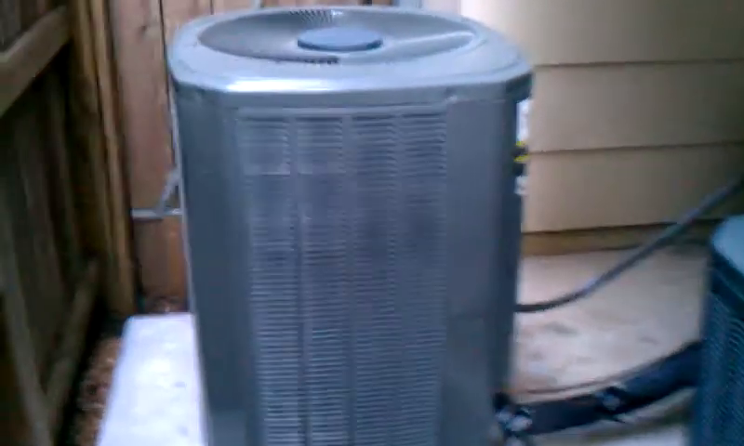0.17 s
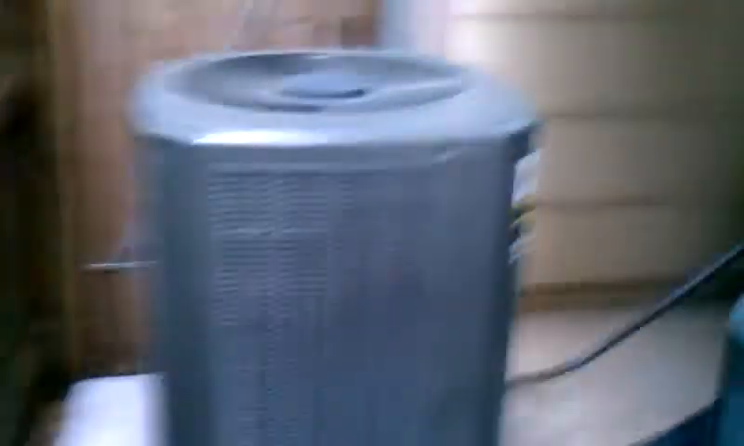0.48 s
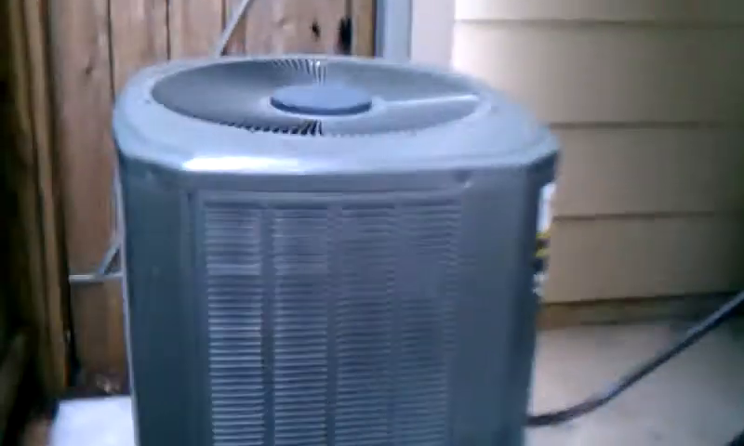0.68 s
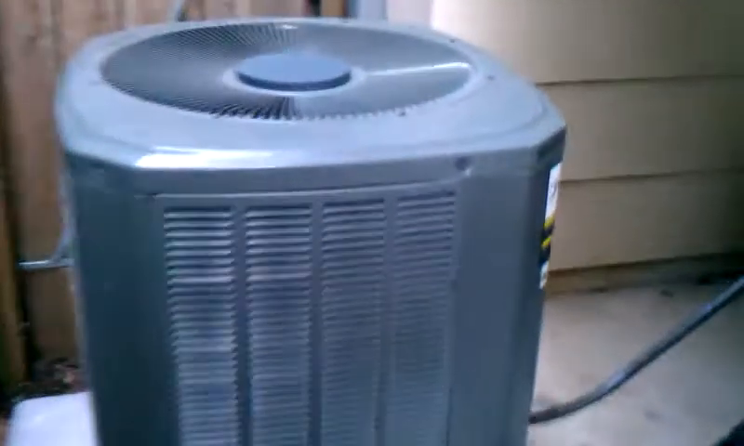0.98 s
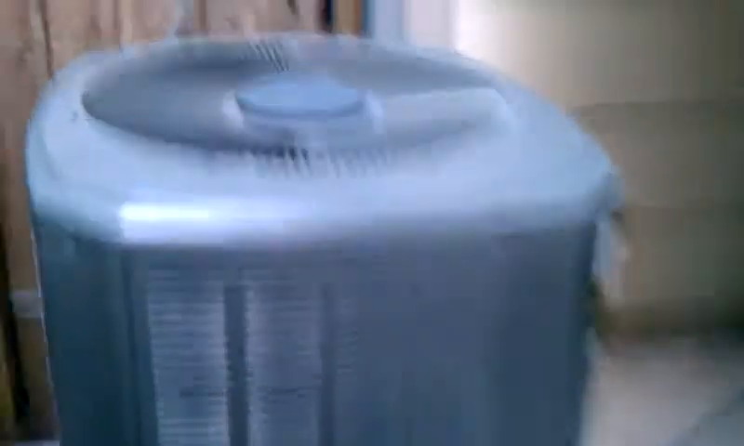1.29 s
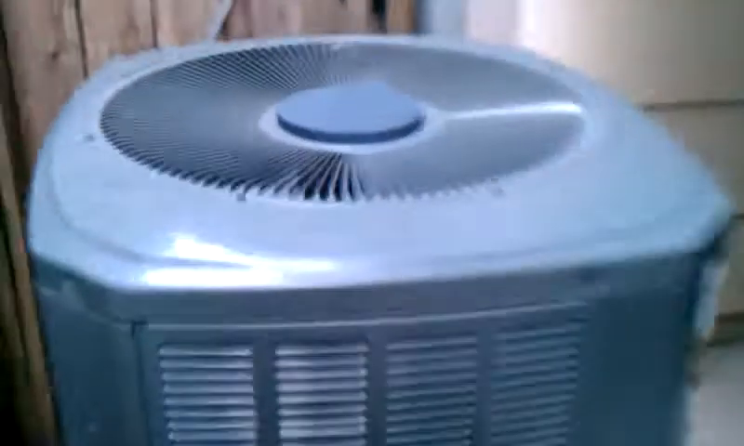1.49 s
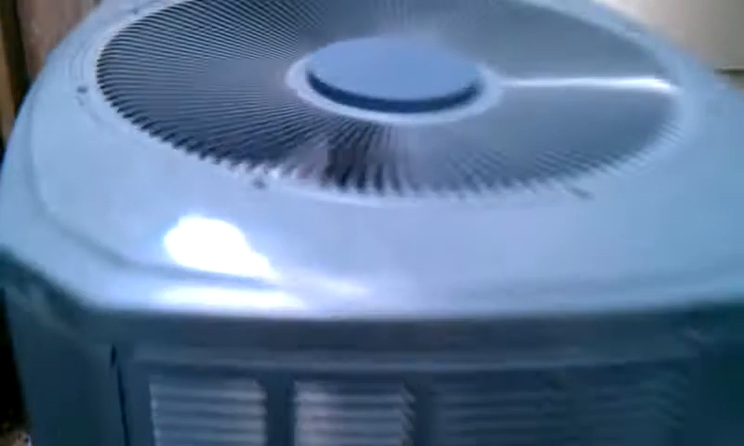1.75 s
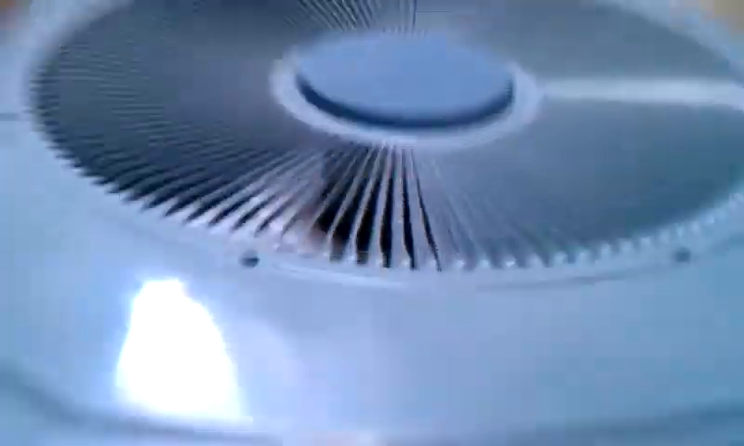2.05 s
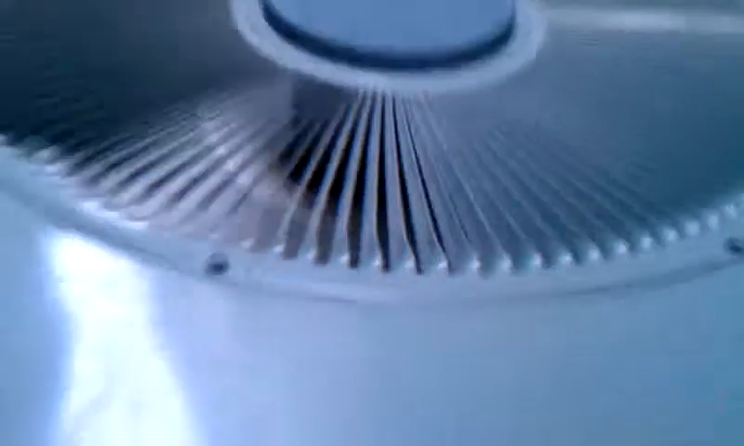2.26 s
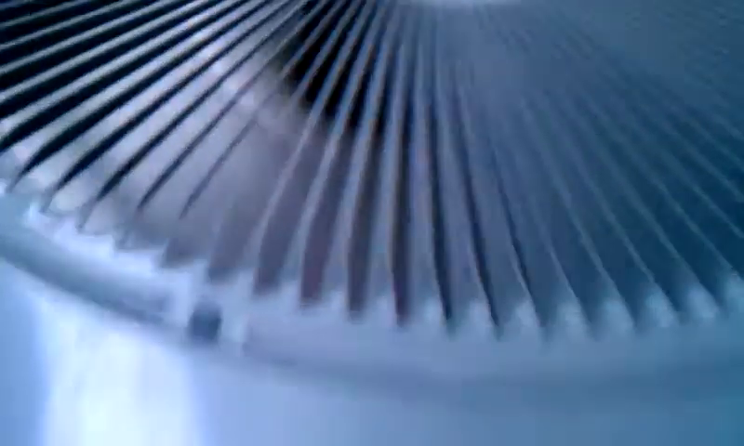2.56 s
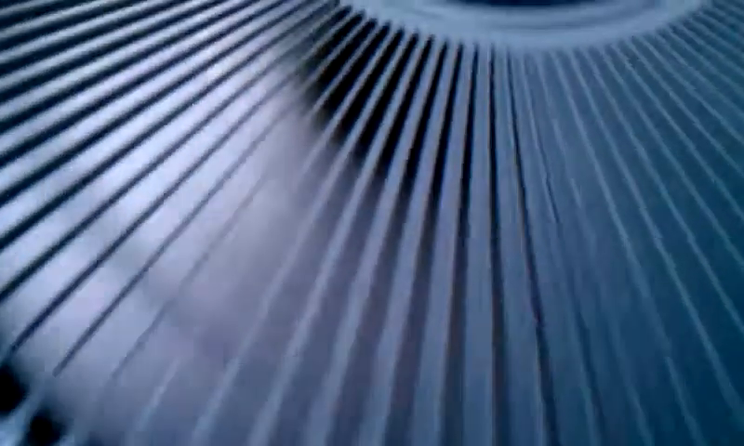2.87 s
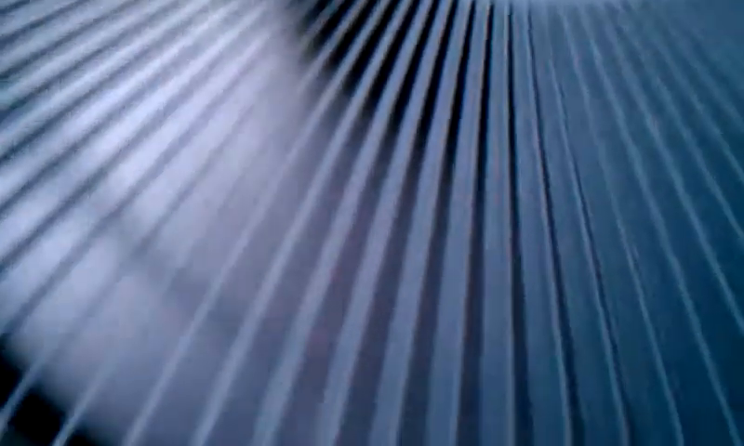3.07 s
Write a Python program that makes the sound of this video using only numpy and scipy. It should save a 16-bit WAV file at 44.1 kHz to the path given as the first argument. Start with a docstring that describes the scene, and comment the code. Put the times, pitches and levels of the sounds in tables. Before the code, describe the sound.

Air conditioner's airy fan roar with low motor hum swells closer, ending in rumbling draught puffs

```python
"""Outdoors, close beside an air conditioner; a phone walks up from its side to the grille on top.
Air rushes through the slats as flickering noise bands, with a faint narrow band of noise that slides
down and, before it, three fainter ones that may pass for chance ripples of the rush.
Blade tones, summed cosines, beat against the motor's mains hum; at last the draught buffets the microphone
with a gusty rumble and puffs. The level drops twice; one lost block makes the tones skip, with a faint tick."""
import sys
import numpy as np
from scipy import signal
from scipy.fft import rfft, irfft, next_fast_len
from scipy.io import wavfile
from scipy.ndimage import uniform_filter1d

SR = 44100
rng = np.random.default_rng(int(sys.argv[2]) if len(sys.argv) > 2 else 0)


def store_pcm(level_fs):
    """Save levels as 16-bit WAV."""
    pcm = np.round(np.clip(level_fs, -1, 1) * 32767).astype(np.int16)
    wavfile.write(sys.argv[1], SR, np.atleast_2d(pcm).T)


N = 142884

# Air rush along the walk: time_s, level_db, place (0 beside the unit, 1 over the grille), treble_lift_db
RUSH_PATH = [(0, -32.5, 0, -3), (.17, -31, 0.21, -0.5), (.4, -28.5, 0, -2), (.55, -27.5, .07, 0),
             (.72, -26.5, 0.36, 0), (.9, -26.5, .1, 2.5), (1.12, -25.5, 0.43, 1), (1.3, -23.5, 0.41, 0),
             (1.6, -23, 0.78, 2), (1.85, -22, 0.6, 1), (2.215, -21.5, .9, 0), (2.225, -24.5, 1, -2.5),
             (2.3, -26, 0.81, 0), (2.42, -23.5, 1, -1), (2.56, -23.5, 1, 1), (2.68, -22.5, 0.94, -.5),
             (2.8, -22, 0.8, -2), (3.0, -19, 0.85, -0.5), (3.008, -25.5, 0.47, -3.5), (3.1, -27, 0.63, 2.5),
             (3.16, -25.5, 1, 0.5), (3.24, -32, 0.73, 1)]
# Spectrum of the rush at the two places: pitch_hz, beside_db_per_hz, grille_db_per_hz
AIR_SPECTRUM = [(25, -19.5, -15), (60, -12.5, -18), (110, -6, -10.5), (189, 1, -7), (244, -0.5, -5),
                (310, -2.5, -1.5), (400, -1, -5), (600, -4, -4), (810, -1.5, -3), (1330, -6, -8.5),
                (1640, -4.5, -7), (2240, -7.5, -6.5), (2520, -8.5, -11.5), (2850, -16, -16.5),
                (3250, -11, -15), (3450, -13, -15), (4360, -14.5, -17)]
TREBLE_FROM_HZ, TREBLE_FULL_HZ = 2100, 2700  # the lift fades in between these
EDDY_DB, SHARED_DB, FLICKER_DB = 0.8, 0.4, 1.3  # flutter of all bands, of five neighbours, of one band

BLADE_HZ, MAINS_HUM_HZ = 42.235, 119.95
HUM_LEAD_S = .00615
BLADE_SMEAR_S = .0013  # each multiple but the sixth leads by this times its number, spreading the pulse
WAVER_DB = 1.8
# Blade tones against the rush: multiple_of_blade_rate, beside_db, grille_db
BLADE_TONES = [(2, -32, -26.5), (4, -20.5, -12), (5, -25.5, -22.5), (7, -13.5, -19.5), (8, -20, -14),
               (9, -18.5, -21), (10, -37.5, -15)]
# Motor hum against the rush: multiple_of_hum, beside_db, grille_db
HUM_TONES = [(1, -24, -24.5), (3, -14, -24.5), (4, -23, -19.5)]
# The beating pair: time_s, sixth_blade_multiple_db, second_hum_multiple_db
BEATING_PAIR = [(0, -47, -42), (.4, -47, -42), (.85, -33, -37), (1.15, -37.5, -52.5), (1.5, -35.5, -28.5),
                (1.75, -30.5, -29.5), (2.0, -29.5, -28), (2.215, -33.5, -25.5), (2.225, -44, -30.5),
                (2.6, -41.5, -30.5), (2.95, -31, -30.5), (3.05, -39, -47), (3.24, -44, -52)]
# Third blade multiple: time_s, level_db
THIRD_BLADE = [(0, -56), (.28, -39.5), (.9, -40), (1.38, -35), (1.58, -47), (1.75, -39.5), (1.95, -35.5),
               (2.1, -48), (2.35, -40), (2.7, -49), (3.0, -43.5)]

# Narrow sliding bands of noise, the last the clearest: start_s, length_s, from_hz, to_hz, level_db
SLIDING_BANDS = [(1.78, .1, 2420, 2300, -36), (1.93, .11, 1780, 1680, -35), (2.1, .07, 2330, 2450, -35),
                 (2.4, .115, 2150, 1590, -30.5)]
SLIDE_WIDTH_HZ, SLIDE_ROUGHNESS = 120, .5

# Rumble of the draught on the microphone: time_s, level_db
DRAUGHT_LEVEL = [(2.6, -60), (2.9, -37.5), (3.0, -29), (3.05, -33), (3.075, -36), (3.1, -32), (3.15, -26.5),
                 (3.19, -32), (3.24, -29.5)]
DRAUGHT_HZ, DRAUGHT_WIDTH_HZ, GUST_DB = 169, 230, 0.5
# Puffs on the microphone: centre_s, fundamental_peak_db, pitch_hz, length_s (centre to 1/e)
MIC_PUFFS = [(2.978, -19, 240, .008), (3.0095, -15.5, 240, .011), (3.039, -21, 130, .004),
             (3.047, -20, 130, .004), (3.066, -21, 300, .003), (3.0995, -18, 150, .004),
             (3.111, -11, 130, .004), (3.12, -14.5, 135, .0035), (3.129, -11, 130, .004),
             (3.1495, -17, 220, .003), (3.168, -12, 200, .006), (3.1735, -15, 300, .002),
             (3.181, -18, 120, .004), (3.196, -15.5, 170, .003), (3.2055, -19, 200, .005),
             (3.2285, -15, 200, .005), (3.235, -21, 110, .004)]
PUFF_EDGE = .25  # share of the octave that sharpens each crest

LOST_AT_S, LOST_S = 2.1895, 1024 / 44100
TICK_DB, TICK_S = -19.5, 0.00039  # step height before the last filter, decay time
# Colour of the phone's microphone: pitch_hz, level_db
PHONE_COLOUR = [(20, -27.5), (45, -0.5), (90, 0), (3000, 0), (3400, -7), (3800, -17), (4200, -26.5),
                (4550, -50.5)]
TOP_HZ, TICK_TOP_HZ = 4544, 15800


def undb(db):
    """Turn dB into gain."""
    return 10 ** (np.asarray(db) / 20)


def curve(table, column=1):
    """One column of a table, joined by straight lines over time."""
    rows = np.array(table, float)
    return np.interp(np.arange(N) / SR, rows[:, 0], rows[:, column])


def walk(rate_hz):
    """Random levels held for 1 / rate_hz seconds and slewed twice; spread near 1."""
    hold = int(SR / rate_hz)
    levels = rng.standard_normal(N // 100)[:N // hold + 1]
    held = np.repeat(levels, hold)
    slewed = uniform_filter1d(uniform_filter1d(held, hold), hold)
    return np.sqrt(2) * slewed[:N]


def band(low_hz, centre_hz, high_hz):
    """Noise whose power rises to a centre and falls again, a triangle on a log frequency axis."""
    log_hz = np.log(np.maximum(np.arange(N // 2 + 1) * SR / N, 1))
    power = np.interp(log_hz, np.log([low_hz, centre_hz, high_hz]), [0, 1, 0])
    return irfft(rfft(rng.standard_normal(N)) * np.sqrt(power), N)


def air_rush(place):
    """Sixth-octave bands of turbulence that roughen together, flutter with neighbours and flicker alone."""
    rows = np.array(AIR_SPECTRUM, float)
    hz = 20 * 2 ** (np.arange(50) / 6)
    beside, grille = (np.interp(np.log(hz), np.log(rows[:, 0]), rows[:, c]) for c in (1, 2))
    lift_db = curve(RUSH_PATH, column=3)
    lift_share = np.interp(hz, [TREBLE_FROM_HZ, TREBLE_FULL_HZ], [0, 1])
    eddies_db = EDDY_DB * walk(90.)
    neighbours = [walk(21.8) for _ in range(10)]
    rush = 0
    for k in range(1, 49):
        db = beside[k] + place * (grille[k] - beside[k]) + lift_share[k] * lift_db
        db = db + eddies_db + SHARED_DB * neighbours[k // 5] + FLICKER_DB * walk(28.04)
        rush = rush + undb(db) * band(*hz[k - 1:k + 2])
    return rush / np.sqrt(np.mean(rush ** 2))


def blade_and_hum_tones(place, rush_db):
    """Multiples of the blade rate and motor hum; most waver, and their clock jumps over the lost block."""
    t = np.arange(N) / SR
    t = t + LOST_S * (t > LOST_AT_S)

    def tone(hz, db, lead_s):
        """A cosine of the given RMS level, set ahead in time."""
        return np.sqrt(2) * undb(db) * np.cos(2 * np.pi * hz * (t + lead_s))

    def wavering_db(beside, grille):
        """Level that follows the rush and the place, with a slow random waver."""
        return rush_db + beside + place * (grille - beside) + WAVER_DB * walk(4.)

    tones = tone(6 * BLADE_HZ, curve(BEATING_PAIR), 0)
    tones = tones + tone(2 * MAINS_HUM_HZ, curve(BEATING_PAIR, column=2), HUM_LEAD_S)
    tones = tones + tone(3 * BLADE_HZ, curve(THIRD_BLADE), 3 * BLADE_SMEAR_S)
    for multiple, beside, grille in BLADE_TONES:
        lead_s = round(multiple) * BLADE_SMEAR_S
        tones = tones + tone(round(multiple) * BLADE_HZ, wavering_db(beside, grille), lead_s)
    for multiple, beside, grille in HUM_TONES:
        tones = tones + tone(round(multiple) * MAINS_HUM_HZ, wavering_db(beside, grille), HUM_LEAD_S)
    return tones


def sliding_bands():
    """Narrow bands, a gliding carrier roughened by slow complex noise, that swell and fade."""
    slides, t = 0, np.arange(N) / SR
    for start_s, length_s, from_hz, to_hz, db in SLIDING_BANDS:
        progress = np.clip((t - start_s) / length_s, 0, 1)
        smooth = int(SR / SLIDE_WIDTH_HZ)
        slow = [uniform_filter1d(rng.standard_normal(N), smooth) for _ in range(2)]
        rough = 1 + SLIDE_ROUGHNESS * (slow[0] + 1j * slow[1]) / slow[0].std()
        phase = 2 * np.pi * np.cumsum(from_hz + progress * (to_hz - from_hz)) / SR
        swell = np.sqrt(2 * np.sin(np.pi * progress).clip(0))
        slides = slides + undb(db) * swell * (rough * np.exp(1j * phase)).real
    return slides


def lost_block_tick():
    """A downward step that decays at once, where the block is lost."""
    after = np.arange(N) / SR - LOST_AT_S
    return -undb(TICK_DB) * (after > 0) * np.exp(-np.abs(after) / TICK_S)


def draught():
    """Moving air on the microphone: gusty low noise, and short puffs of a few cycles in bell envelopes."""
    t = np.arange(N) / SR
    rumble = band(DRAUGHT_HZ - DRAUGHT_WIDTH_HZ / 2, DRAUGHT_HZ, DRAUGHT_HZ + 2 * DRAUGHT_WIDTH_HZ)
    buffeting = rumble / rumble.std() * undb(curve(DRAUGHT_LEVEL) + GUST_DB * walk(40.))
    for centre_s, db, hz, length_s in MIC_PUFFS:
        since = t - centre_s
        bell = np.exp(-np.abs(since / length_s) ** 2.0)
        wave = np.cos(2 * np.pi * hz * since) + PUFF_EDGE * np.cos(4 * np.pi * hz * since)
        buffeting = buffeting + undb(db) * bell * wave
    return buffeting


def scene():
    """Rush, tones, sliding bands and draught at one microphone."""
    place = np.clip(curve(RUSH_PATH, column=2), 0, 1)
    rush_db = curve(RUSH_PATH)
    rush = undb(rush_db) * air_rush(place)
    tones = blade_and_hum_tones(place, rush_db)
    return (rush + tones + sliding_bands() + draught())[None]


def low_pass(x, hz):
    """Steep elliptic filter that removes what lies above hz."""
    return signal.sosfilt(signal.ellip(8, .2, 80, hz, fs=SR, output="sos"), x)


def record(dry):
    """Narrow phone band; the tick joins after its low-pass and so reaches higher."""
    rows = np.array(PHONE_COLOUR, float)
    size = next_fast_len(N + SR // 2)
    log_hz = np.log(np.arange(size // 2 + 1) * SR / size + 1)
    colour = undb(np.interp(log_hz, np.log(rows[:, 0]), rows[:, 1]))
    coloured = irfft(rfft(dry, size) * colour, size)[:, :N]
    return low_pass(low_pass(coloured, TOP_HZ) + lost_block_tick(), TICK_TOP_HZ)


dry = scene()
out = record(dry)
store_pcm(out)
```